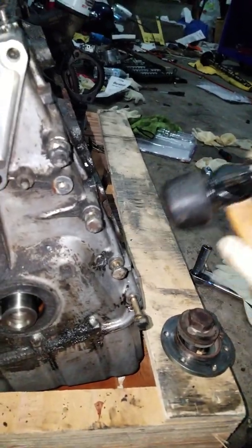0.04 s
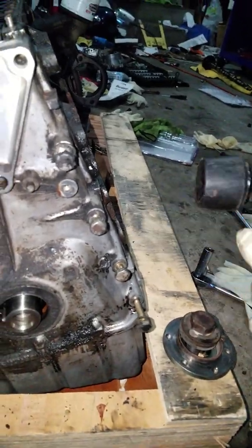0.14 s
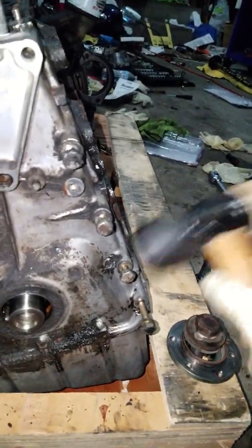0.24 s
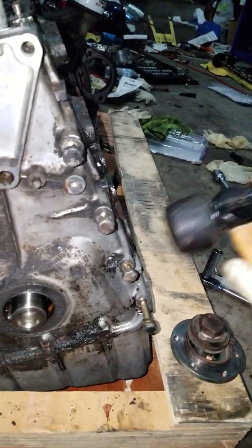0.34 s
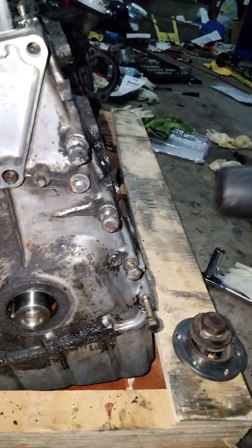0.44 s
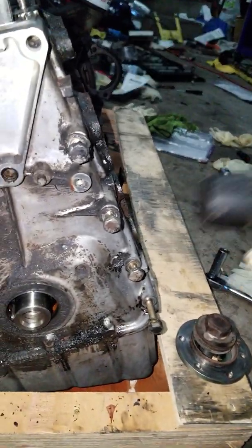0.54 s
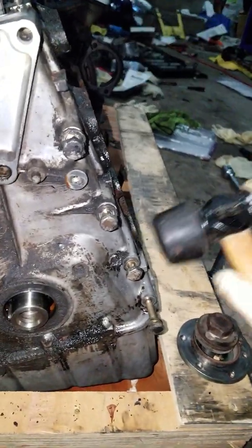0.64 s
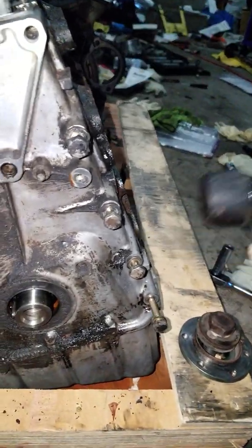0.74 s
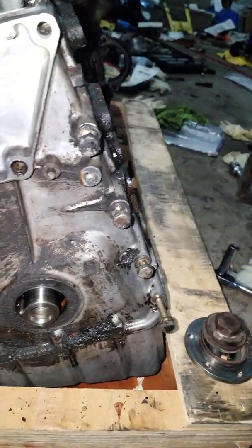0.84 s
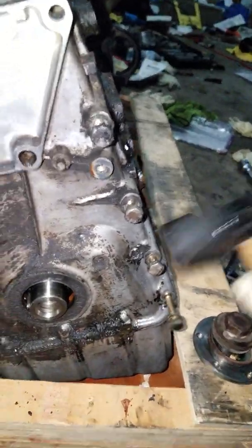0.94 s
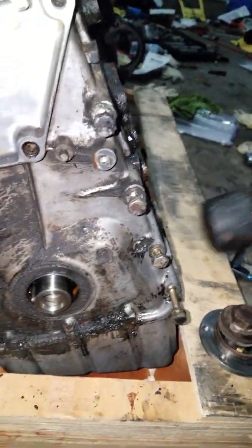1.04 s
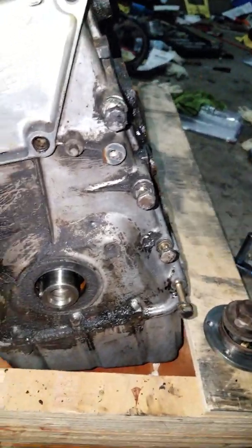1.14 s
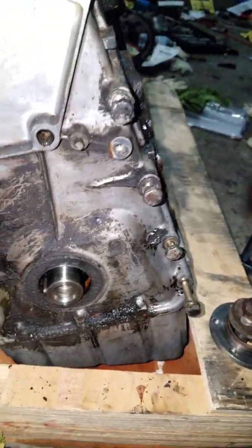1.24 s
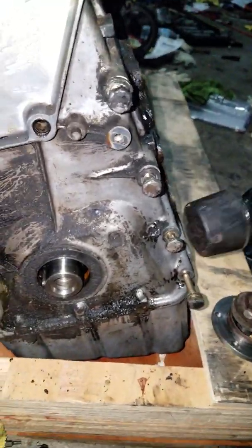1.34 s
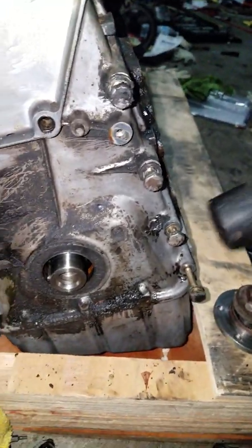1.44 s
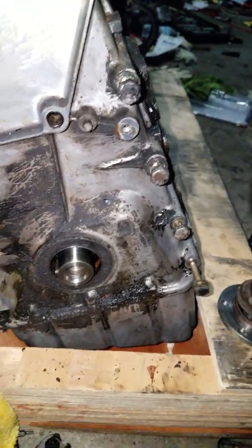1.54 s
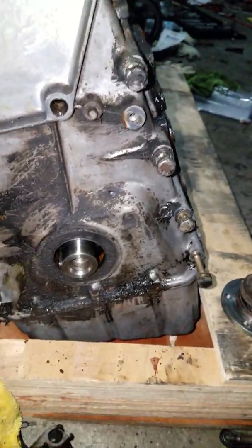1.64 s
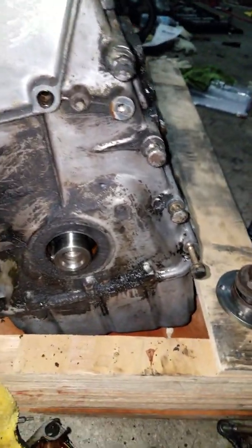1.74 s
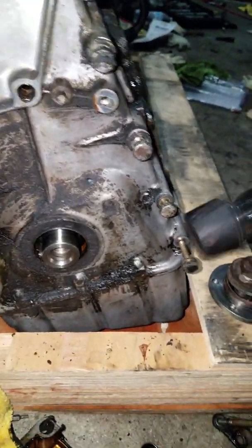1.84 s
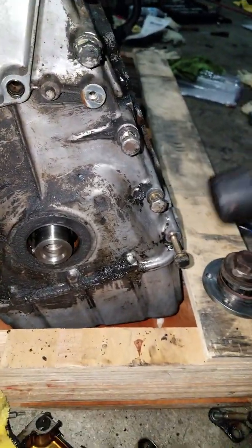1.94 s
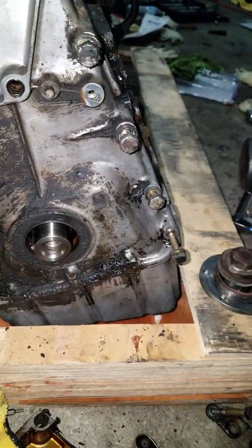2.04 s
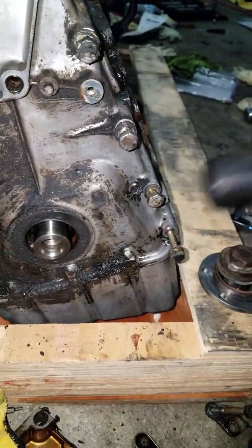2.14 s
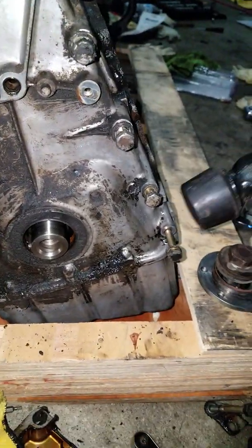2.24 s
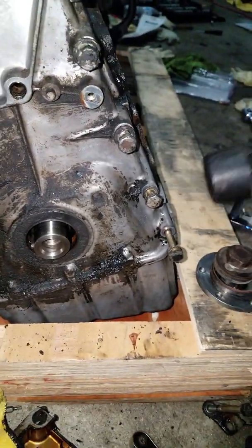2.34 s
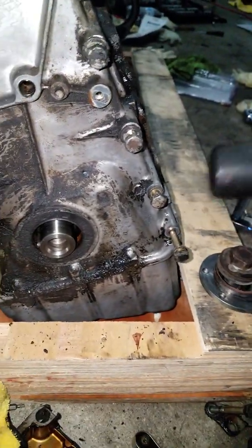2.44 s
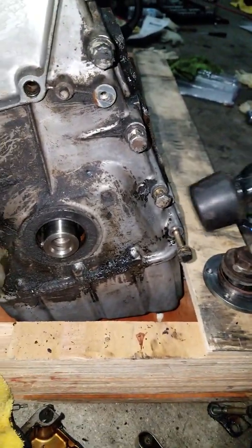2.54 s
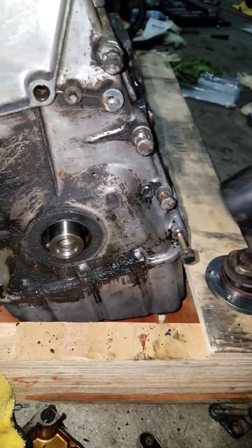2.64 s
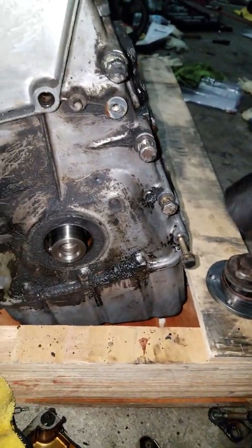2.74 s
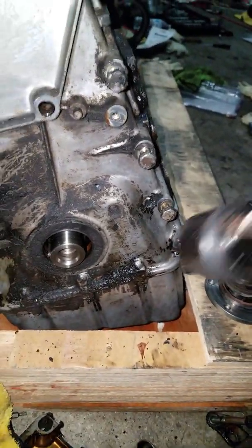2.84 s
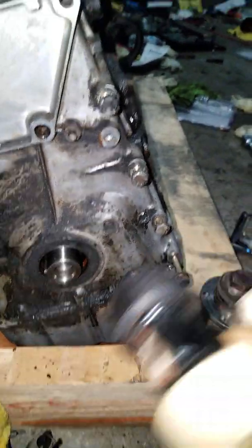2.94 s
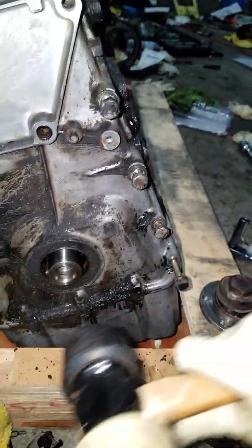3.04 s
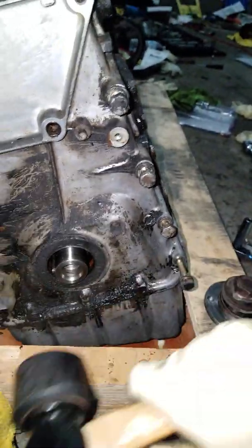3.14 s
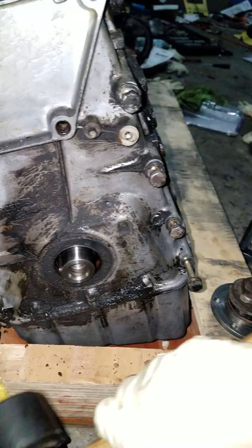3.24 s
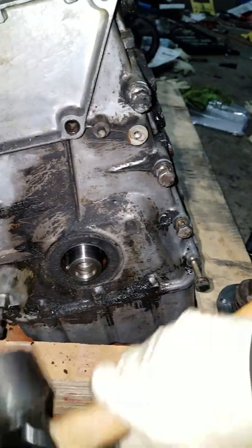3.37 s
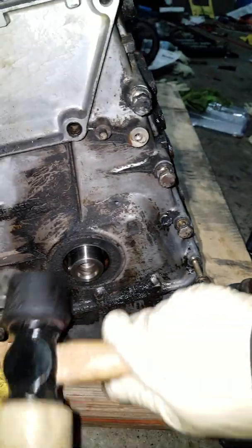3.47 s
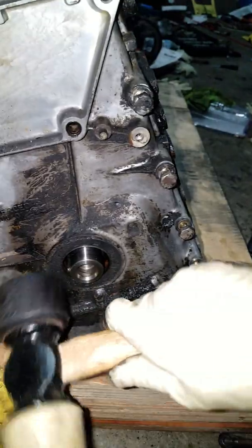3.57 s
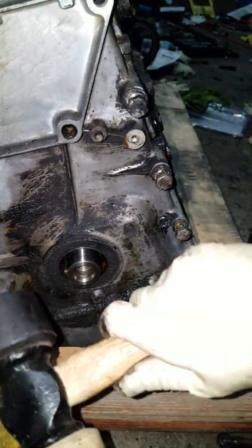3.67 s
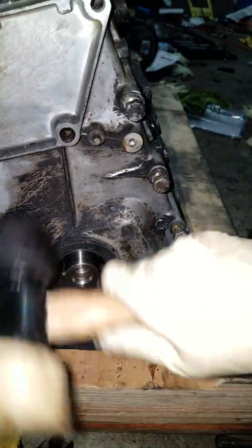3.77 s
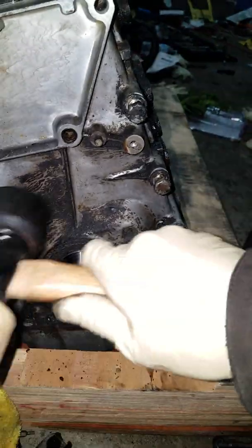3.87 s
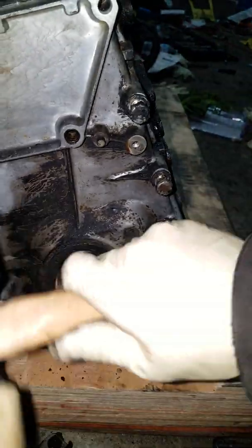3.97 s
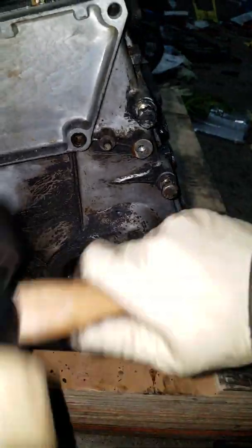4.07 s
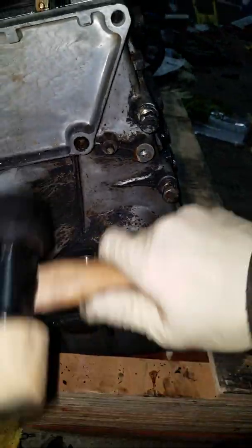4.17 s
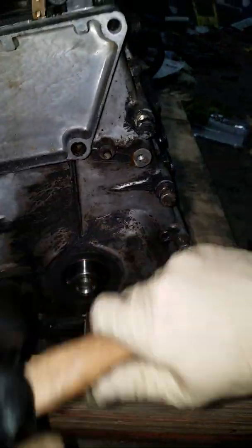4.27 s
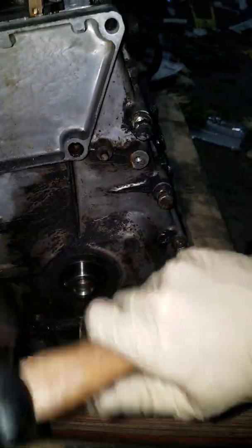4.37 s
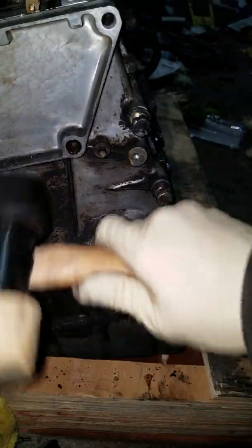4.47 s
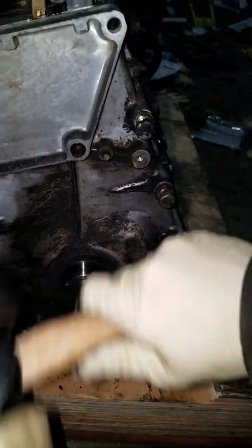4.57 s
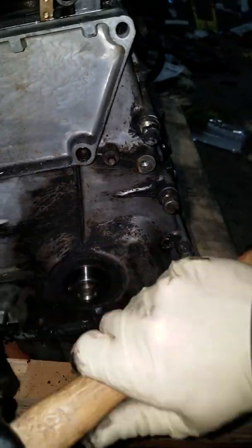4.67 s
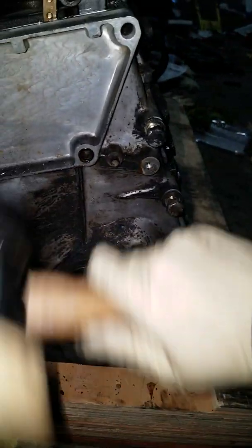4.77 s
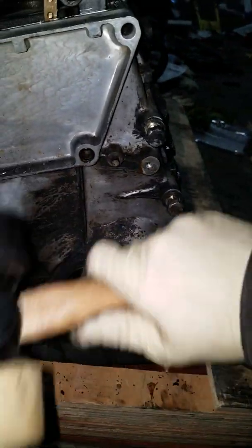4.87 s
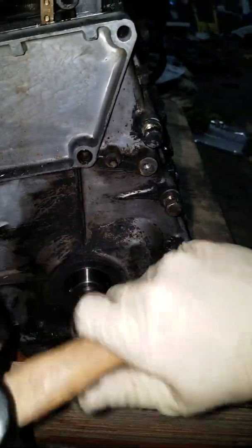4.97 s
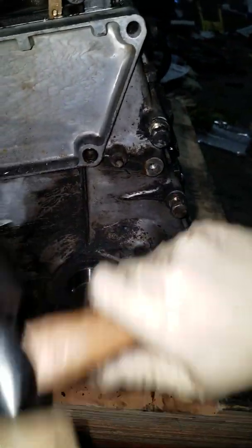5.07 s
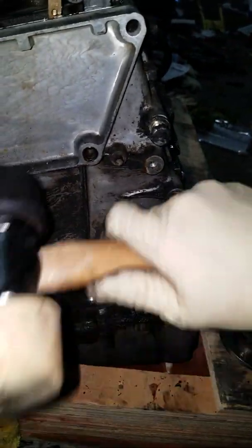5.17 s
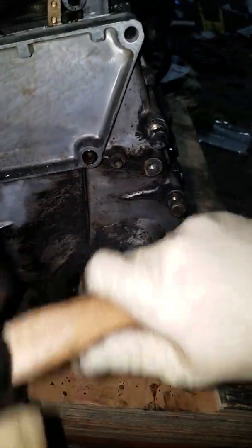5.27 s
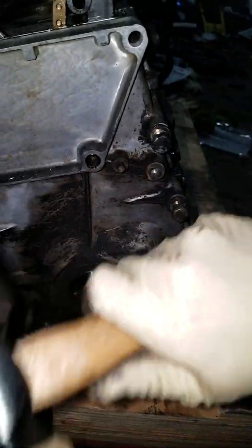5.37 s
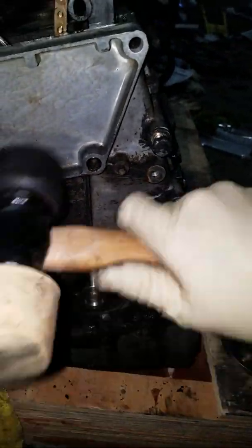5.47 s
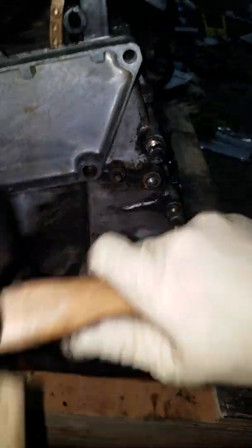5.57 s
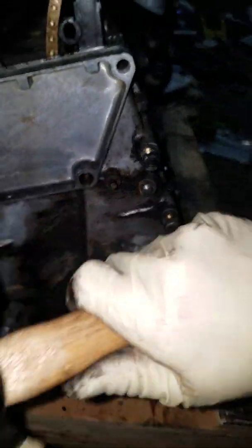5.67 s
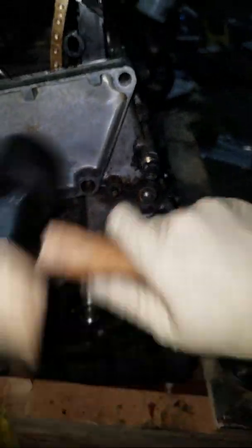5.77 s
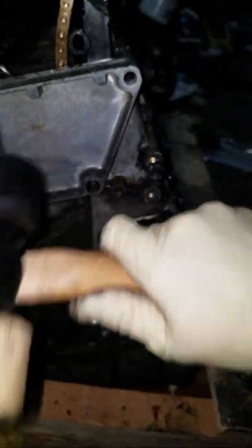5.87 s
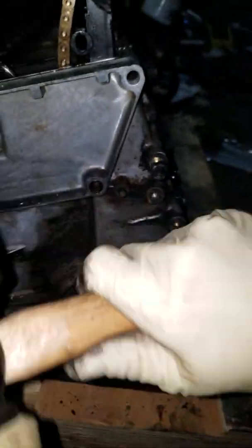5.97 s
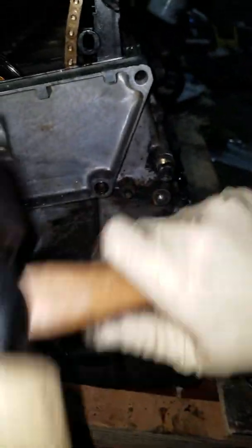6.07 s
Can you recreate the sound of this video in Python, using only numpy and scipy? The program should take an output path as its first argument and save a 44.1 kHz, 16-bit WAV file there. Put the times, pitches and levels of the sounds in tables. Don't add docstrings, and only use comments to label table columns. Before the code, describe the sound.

Dull, quickly damped knocks of rubber on heavy cast metal come in two runs. The first is moderate and hollow, with one weak double touch and wooden thumps from the pallet. The second, after a gap, is louder, drier and more clicking, growing stronger. Close stereo phone microphone, brighter on the left, with short garage reverberation, faint traffic rumble and hiss.

```python
import sys
import numpy as np
from scipy import signal
from scipy.io import wavfile
from scipy.ndimage import uniform_filter1d

SR = 44100
rng = np.random.default_rng(int(sys.argv[2]) if len(sys.argv) > 2 else 0)


def amp(db):
    return 10 ** (np.asarray(db, float) / 20)


def write(x):
    x = np.atleast_2d(x).T
    wavfile.write(sys.argv[1], SR, np.round(np.clip(x, -1, 1) * 32767).astype(np.int16))


N = 269230

# (frequency [Hz], level per Hz [dB])
AIR_SPECTRUM = [(20, -9.5), (43, -4), (97, -0.5), (200, -5), (487, -16.5), (729, -14), (2500, -20.5),
                (3600, -34)]
# (frequency [Hz], level per Hz [dB])
ROAR_SPECTRUM = [(60, -30), (150, -3.5), (300, 4.5), (500, -4), (700, -9.5), (1000, -11), (2000, -23.5),
                 (4000, -30)]
# (frequency [Hz], level per Hz [dB])
HISS_SPECTRUM = [(1650, -26), (2800, -11.5), (3560, -11), (7600, -7), (8610, -15.5), (13100, 0),
                 (15100, 1.5), (16000, -14)]
AIR_DB, HISS_DB = -47.5, -45
ROAR_END_DB, ROAR_RISE_DB_PER_S = -44, 6.5

# (frequency [Hz], correlation [-1..1])
PORT_LIKENESS = [(60, 1), (130, 0.93), (290, 0.89), (640, 0.34), (1410, -0.25), (3100, 0.03), (6820, 0.078)]
# (frequency [Hz], left minus right [dB])
PORT_LEAN = [(60, 0.5), (160, -3), (740, -1), (1220, 4), (3330, 10), (5500, 24), (9080, 41), (15000, 15)]
# (frequency [Hz], extra loss [dB])
HAND_LOSS = [(1000, 0.5), (2200, -1), (9000, 11), (15000, -1)]
PORT_BASS_HZ, TOP_HZ = 47.5, 16150
SHADE_HZ = 3220
TICK_LEAN_DB = -2

# (frequency [Hz], t60 [s])
GARAGE_DECAY = [(100, 0.54), (250, 0.37), (600, 0.24), (1500, 0.36), (3000, 0.31), (6000, 0.2)]
# (frequency [Hz], level [dB])
GARAGE_TONE_DB = [(100, -5.5), (200, -4.5), (350, 1), (700, 2), (1060, -10), (1500, -2.5), (2400, -5),
                  (6000, -5)]
FACE_ECHO = (0.0051, -12, 3300)
EDGE_ECHO = (0.0155, -13, 430)

# (frequency [Hz], left [dB], right [dB], t60 [s])
SETTLE_MODES = [(103, -5.5, -3, 0.089), (151, 1.5, 5, 0.054), (206, -8, -1, 0.053)]
SETTLE_S, SETTLE_DB, SETTLE_RISE_S = 0.056, -4, 0.004
JOLT = (3.827, -24)

# (time [s], strength [dB], pallet thud re strength [dB], squareness re ordinary [dB], spot pitch [Hz])
EDGE_HITS = [
    (0.2492, -17.5, -11, 3, 1050),
    (0.5958, -19.5, -9, 9, 1130),
    (0.9443, -19.5, -10, -1.5, 1060),
    (1.2894, -31, -14, -10, 1150),
    (1.2959, -31, -4, 11, 1320),
    (1.8357, -22, -8.5, 0, 1040),
    (2.1748, -19, -9.5, -1, 1040),
    (2.4903, -20, -11.5, -2, 1100),
]
# (time [s], strength [dB], pallet thud re strength [dB], squareness re ordinary [dB], spot pitch [Hz])
FACE_HITS = [
    (3.8146, -14, -23, -14.5, 1480),
    (4.1397, -15.5, -18.5, 7.5, 1350),
    (4.4737, -15.5, -20, -4.5, 1470),
    (4.8127, -12, -17, 2.5, 1240),
    (5.1466, -9, -19.5, -3.5, 1390),
    (5.4667, -8.5, -22, -1, 1430),
    (5.8016, -10.5, -21, 13.5, 2440),
]
# (frequency [Hz], left [dB], right [dB], t60 [s])
EDGE_COVER_MODES = [(431, -12.5, -13, 0.047), (563, -20, -15, 0.016), (800, -12, -9, 0.046),
                    (905, -9, -17, 0.014), (1037, -2.5, -4, 0.034), (1174, -6, -8, 0.0079),
                    (1355, 1, -5, .011), (1620, -7.5, -19, 0.017), (1890, -7, -5, 0.022),
                    (2226, -4, -16, 0.016), (2840, -7, -1.5, 0.0094), (4030, -9, -15, 0.012),
                    (5300, -4, -16, 0.005)]
# (frequency [Hz], left [dB], right [dB], t60 [s])
FACE_COVER_MODES = [(867, -16, -14.5, 0.048), (1084, -12, -25, 0.023), (1212, -7.5, -14.5, 0.022),
                    (1330, -6, -14.5, 0.0073), (1500, -3, -4.5, 0.011), (1706, -6, -16, 0.014),
                    (2040, -4, -17, 0.017), (2360, -4.5, -10, 0.0094), (2970, -4, -9, 0.0045),
                    (4100, 2, -21, .003), (5440, -3, -17, 0.003), (7100, -10, -26, .003)]
# (frequency [Hz], left [dB], right [dB], t60 [s])
EDGE_PALLET_MODES = [(101, -23, -28.5, 0.12), (145, -13.5, -11, .13), (176, -2, -3, 0.045),
                     (213, -4.5, 0.5, 0.092), (294, -8, -5, 0.021)]
# (frequency [Hz], left [dB], right [dB], t60 [s])
FACE_PALLET_MODES = [(87, -21.5, -18.5, 0.17), (143, -24, -11.5, 0.11), (208, -5.5, -1.5, 0.029),
                     (278, -5.5, -2.5, 0.034), (448, -8.5, -11, 0.041), (524, -3.5, 0, 0.032),
                     (648, -4, 3.5, 0.018)]
EDGE_STRIKE = dict(knock_db=2.1, boom_db=11, tick_db=-1.5, room_db=-9.5, tick_hz=2510, radiate_hz=160,
                   rise_s=0.00058, thud_rise_s=0.00077, ring_lag=5.5, tick_lag=3.3, sense=1)
FACE_STRIKE = dict(knock_db=2.5, boom_db=17, tick_db=5.3, room_db=-16, tick_hz=2260, radiate_hz=990,
                   rise_s=0.00034, thud_rise_s=0.00067, ring_lag=-0.52, tick_lag=10.6, sense=-1)
SPOT_DB, SPOT_OCTAVES = 5.5, 0.21
CONTACT_HZ = 6860
LOCAL_HZ = 2100


def evened(x):
    return x / np.sqrt(np.mean(x ** 2) + 1e-20)


def peaked(x):
    return x / abs(x.mean(0)).max()


def read(points, hz):
    f, value = np.transpose(points)
    return np.interp(np.log(hz + 1), np.log(f + 1), value)


def delayed(x, samples):
    n = np.arange(len(x))
    return np.interp(n - samples, n, x, left=0)


def lagged(x, samples):
    return np.array([x[0], delayed(x[1], samples)])


def ring(modes, sign, t):
    hz, left_db, right_db, t60 = np.transpose(modes)[:, :, None]
    sines = sign * np.sin(2 * np.pi * hz * t) * amp(-60 * t / t60)
    return np.array([(amp(left_db) * sines).sum(0), (amp(right_db) * sines).sum(0)])


def background():
    frames, hz = N // 512 + 5, np.fft.rfftfreq(2048, 1 / SR)
    a, b, c, d, patches = rng.standard_normal((frames, len(hz), 5)).T
    patches = uniform_filter1d(patches, size=9, axis=0)
    patches = evened(uniform_filter1d(patches, size=7, axis=1))
    t = np.arange(frames) * 512 / SR
    heard = hz < TOP_HZ
    air = evened(amp(read(AIR_SPECTRUM, hz)))[:, None] * amp(AIR_DB)
    swell = amp(ROAR_END_DB - ROAR_RISE_DB_PER_S * (N / SR - t))
    roar = evened(amp(read(ROAR_SPECTRUM, hz)))[:, None] * swell
    hiss = evened(amp(read(HISS_SPECTRUM, hz)) * heard)[:, None] * amp(HISS_DB + 1.44 * patches)
    level = np.sqrt((air ** 2 + roar ** 2) * amp(3.05 * patches) + hiss ** 2) * heard[:, None]
    same = read(PORT_LIKENESS, hz)[:, None]
    left = a + 1j * b
    right = same * left + np.sqrt(1 - same ** 2) * (c + 1j * d)
    lean = amp(-read(PORT_LEAN, hz) - read(HAND_LOSS, hz))[:, None]
    mid = np.sqrt(1 + lean ** 2 + 2 * lean * same) / 2
    unit = np.std(signal.istft(left, nperseg=2048, noverlap=1536)[1])
    ports = np.array([left, right * lean]) * level / mid
    return signal.istft(ports, nperseg=2048, noverlap=1536)[1][:, :N] / unit


def garage(send):
    slot = SR // 3
    out = np.zeros((2, N + 2 * SR))
    for start in range(slot // 2, N, slot):
        taps = np.zeros((2, SR // 2))
        at = np.arange(300, SR // 2 - 20, 20)
        at = at + rng.integers(0, 20, (2, len(at)))
        np.put_along_axis(taps, at, rng.choice([-1., 1.], at.shape), 1)
        hz, t, z = signal.stft(taps, SR, nperseg=256)
        same = read(PORT_LIKENESS, hz)[:, None]
        z[1] = same * z[0] + np.sqrt(1 - same ** 2) * z[1]
        z[1] *= amp(-0.8 * read(PORT_LEAN, hz))[:, None]
        z *= amp(read(GARAGE_TONE_DB, hz)[:, None] - 60 * t / read(GARAGE_DECAY, hz)[:, None])
        tail = signal.istft(z, SR, nperseg=256)[1]
        tail /= np.linalg.norm(tail[0])
        wet = signal.fftconvolve(send[None, start:start + slot], tail, axes=1)
        out[:, start:start + wet.shape[1]] += wet
    return out[:, :N]


def settling():
    t, train = np.arange(SR // 8) / SR, np.zeros(N)
    thump = -peaked(ring(SETTLE_MODES, 1, t) * (1 - np.exp(-t / SETTLE_RISE_S)))
    drops = [(s + SETTLE_S, db + thud_db + SETTLE_DB) for s, db, thud_db, _, _ in EDGE_HITS]
    for s, db in drops + [JOLT]:
        train[round(s * SR)] = amp(db)
    return signal.oaconvolve(train[None], thump, axes=1)[:, :N]


def struck_modes(cover, spot_hz):
    landed = np.array(cover, float)
    landed[:, 0] *= 1 + 0.015 * rng.standard_normal(len(cover))
    landed[:, 1:3] += 1.5 * rng.standard_normal((len(cover), 2))
    octaves = np.log2(landed[:, :1] / spot_hz)
    landed[:, 1:3] += SPOT_DB * np.exp(-(octaves / SPOT_OCTAVES) ** 2)
    return landed


def head_tick(tick_hz, hardness, t):
    hz = tick_hz * np.array([[1.25], [0.95]]) * hardness ** 0.21
    return np.sin(2 * np.pi * hz * t) * np.exp(-0.9 * hz * t)


def blows(table, cover, pallet, echo, knock_db, boom_db, tick_db, room_db, tick_hz, radiate_hz, rise_s,
          thud_rise_s, ring_lag, tick_lag, sense):
    direct, send, t = np.zeros((2, N)), np.zeros(N), np.arange(SR // 4) / SR
    radiate = signal.butter(2, radiate_hz, "high", fs=SR)
    shadow = signal.butter(2, SHADE_HZ, fs=SR)
    echo_s, echo_db, echo_hz = echo
    dull = signal.butter(2, echo_hz, fs=SR)
    bending = (-sense) ** np.arange(len(cover))[:, None]
    local = np.array(cover)[:, :1] > LOCAL_HZ
    rise, thud_rise = 1 - np.exp(-t / rise_s), 1 - np.exp(-t / thud_rise_s)
    port_lean = amp(np.array([[0], [TICK_LEAN_DB]]))
    for s, db, thud_db, snap_db, spot_hz in table:
        hardness = amp(0.62 * snap_db)
        contact = signal.butter(4, np.clip(CONTACT_HZ * hardness, 2e3, 17e3), fs=SR)
        landed = struck_modes(cover, spot_hz)
        tick = head_tick(tick_hz, hardness, t)
        whole = lagged(ring(landed, bending * ~local, t) * rise, ring_lag)
        spot = lagged(ring(landed, bending * local, t) * rise, tick_lag)
        knock = peaked(whole + spot)
        knock += amp(tick_db) * hardness ** 0.42 * lagged(tick * port_lean, tick_lag)
        knock = signal.lfilter(*contact, knock)
        knock = peaked(signal.lfilter(*radiate, knock))
        thud = lagged(peaked(ring(pallet, sense, t) * thud_rise), tick_lag)
        sound = -amp(db) * (amp(knock_db) * knock + amp(boom_db + thud_db) * thud)
        sound[1] = signal.lfilter(*shadow, sound[1])
        bounce = [delayed(port, echo_s * SR) for port in signal.lfilter(*dull, sound)]
        sound += amp(echo_db) * np.array(bounce)
        to_room = amp(room_db) * (sound[0] - amp(db + knock_db) * tick[1])
        at = round(s * SR)
        size = min(len(t), N - at)
        direct[:, at:at + size] += sound[:, :size]
        send[at:at + size] += to_room[:size]
    return direct, send


def scene():
    edge, edge_send = blows(EDGE_HITS, EDGE_COVER_MODES, EDGE_PALLET_MODES, EDGE_ECHO, **EDGE_STRIKE)
    face, face_send = blows(FACE_HITS, FACE_COVER_MODES, FACE_PALLET_MODES, FACE_ECHO, **FACE_STRIKE)
    return background() + garage(edge_send + face_send) + settling() + edge + face


def roll_off(x):
    return signal.sosfilt(signal.butter(12, 17100, fs=SR, output="sos"), x)


def record(dry):
    ported = signal.lfilter(*signal.butter(4, PORT_BASS_HZ, "high", fs=SR), dry)
    return roll_off(ported)


dry = scene()
out = record(dry)
write(out)
```